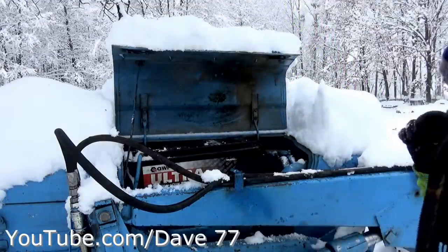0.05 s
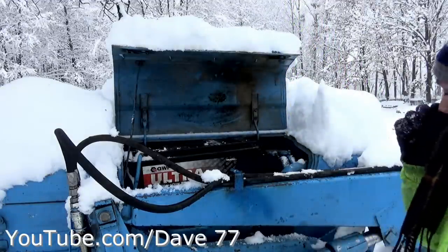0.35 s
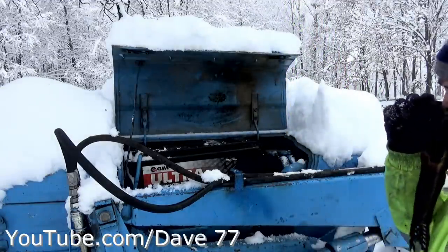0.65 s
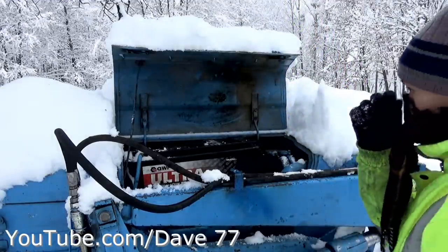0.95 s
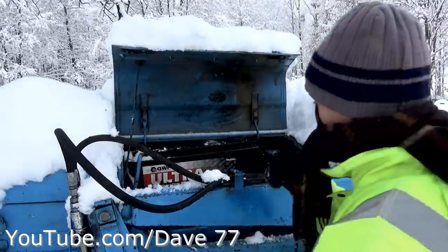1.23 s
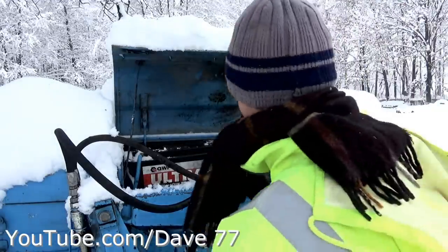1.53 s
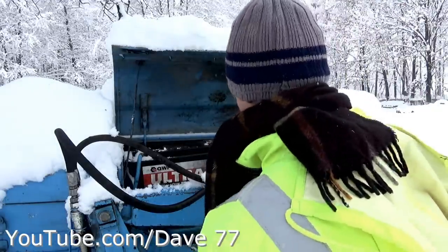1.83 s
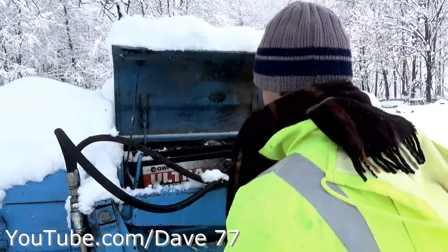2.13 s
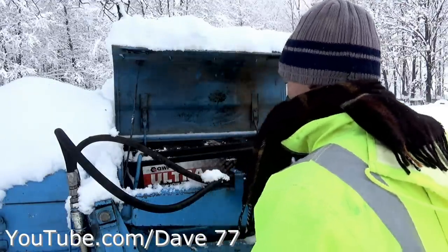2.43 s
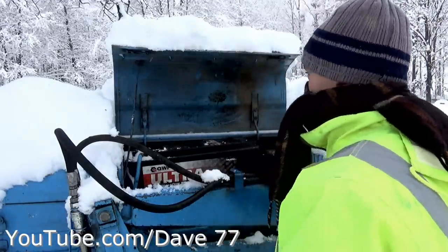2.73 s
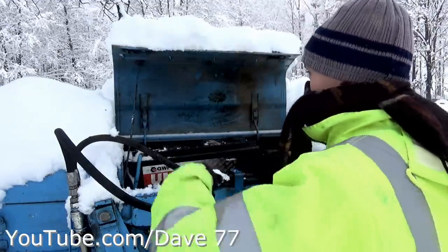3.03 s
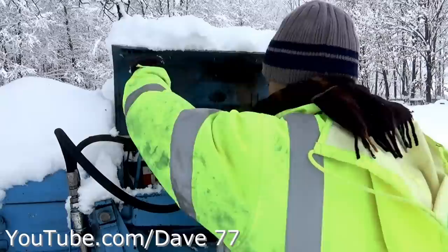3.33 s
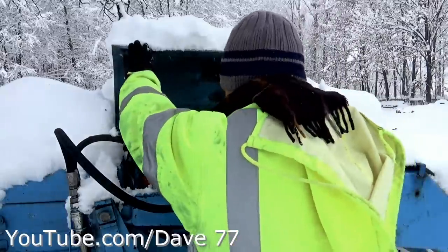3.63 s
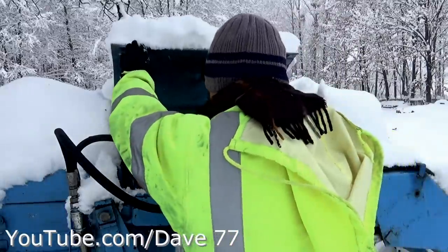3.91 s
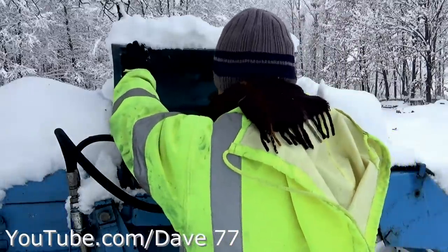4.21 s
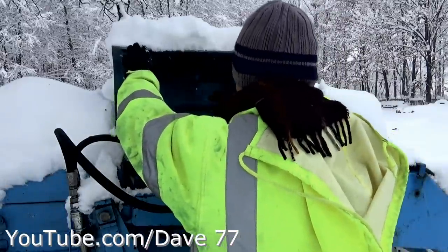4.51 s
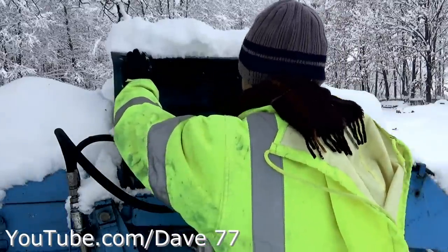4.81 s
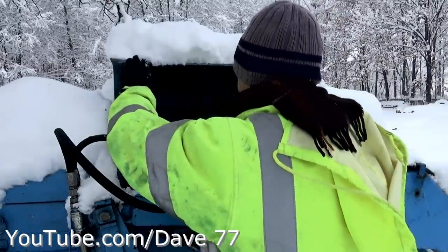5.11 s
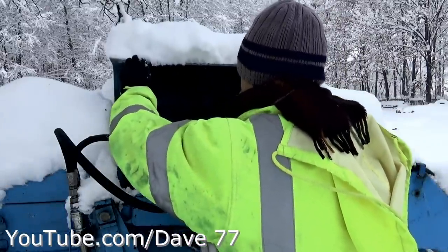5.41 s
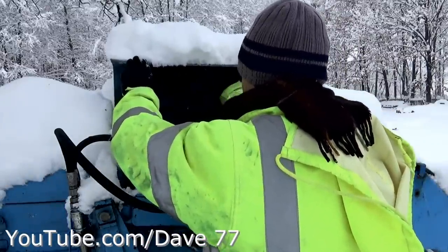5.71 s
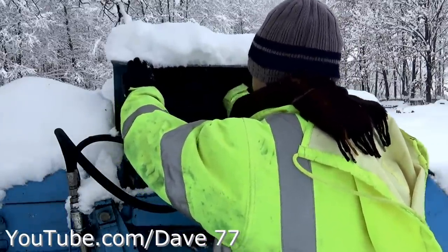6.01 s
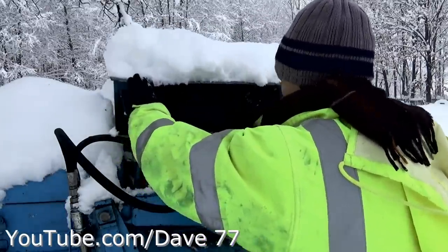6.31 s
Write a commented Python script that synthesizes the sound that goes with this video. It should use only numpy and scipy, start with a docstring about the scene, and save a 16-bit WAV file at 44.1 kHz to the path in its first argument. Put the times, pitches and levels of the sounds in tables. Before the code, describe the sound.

Someone in a stiff nylon jacket moves near the microphone, the cloth hissing, rubbing and flapping in uneven strokes. After the biggest swishes, the lid of a machine's steel box is worked loose: two quick clusters of bright clicks, hinge chatter and small knocks, with almost no echo. Faint outdoor air and a low drone lie underneath, with a slight fading squeal at the very start.

```python
"""A stiff nylon jacket swishes and flaps as its wearer, outdoors in snow, frees the lid of a machine's steel box.
Sliding cloth hisses and rustles; buckling folds snap. The lid's stay and hinges click, chatter and
knock, ringing the fittings, rim and panels briefly. Faint air and a low drone lie underneath,
with a thin squeal that fades at the start."""
import sys
import numpy as np
from scipy import signal
from scipy.fft import rfft, irfft, next_fast_len
from scipy.io import wavfile
from scipy.ndimage import map_coordinates

SR = 44100
rng = np.random.default_rng(int(sys.argv[2]) if len(sys.argv) > 2 else 0)


def pcm_store(signal):
    """Save signal as 16-bit PCM."""
    levels = np.round(np.clip(np.atleast_2d(signal), -1, 1) * 32767)
    wavfile.write(sys.argv[1], SR, levels.astype(np.int16).T)


N = 289002

# outdoor air spectrum: f/Hz, relative level/dB
AIR_SPECTRUM = [(25, -42), (70, -19), (110, 2.5), (170, -7), (240, 2), (350, -3), (600, -4.5), (1150, -3),
                (1800, -8), (2500, -10.5), (5000, -11.5), (8800, -38), (12000, -14.5), (15500, -23.5)]
# background noise bands: f/Hz, width/Hz, rms level/dB
DRONE_BANDS = [(122.5, 21, -79), (1088, 100, -74.5)]
# stereo likeness of air and cloth: f/Hz, left-right correlation/1
COHERENCE = [(120, .999), (300, 0.98), (600, 0.66), (2000, 0.65), (8000, 0.93), (13000, 1)]
# squeal and a weaker, lower tone: start f/Hz, sag/(Hz/s), level/dB, fade/(dB/s)
SQUEAL_TONES = [(1482, 130, -59, 32), (796, 430, -69.5, 3)]
# body movement in the jacket: t/s, effort/dB
BODY_EFFORT = [(0, -58), (.42, -67), (.92, -67.5), (1.12, -60), (1.45, -60.5), (1.85, -63), (1.95, -64.5),
               (2.3, -69), (2.8, -58.5), (3.24, -51), (3.5, -54.5), (4.1, -60), (4.3, -64), (4.9, -61),
               (5.1, -68.5), (5.65, -68.5), (6.22, -64.5), (6.55, -67.5)]
# sleeve strokes: peak t/s, length/s, hiss level/dB, rub level/dB
SLEEVE_STROKES = [(0.653, 0.076, -56.5, -60.5), (0.768, 0.14, -59.5, -60.5), (1.022, 0.11, -63, -63.5),
                  (1.164, 0.078, -52.5, -62), (1.304, 0.086, -52.5, -58), (1.49, 0.11, -57, -66),
                  (2.01, 0.12, -61, -83), (2.377, 0.18, -61, -80), (2.576, 0.12, -54, -72),
                  (2.64, 0.092, -46, -59), (3.22, 0.1, -49, -54.5), (4.917, 0.24, -60.5, -73),
                  (5.825, 0.17, -61, -73), (6.143, 0.19, -65, -73)]
# sliding nylon, rubbing cloth spectra: f/Hz, relative level/dB
HISS_SPECTRUM = [(300, -34), (1000, -14), (2000, -6), (3000, -5.5), (5000, -6.5), (7000, -3), (8700, 0.5),
                 (10000, -4), (12000, -13), (15500, -24.5)]
RUB_SPECTRUM = [(50, -25), (120, 3), (220, -9.5), (350, 0.5), (700, 0.5), (1300, 2.5), (2100, 0.5),
                (3000, -6), (6000, -8.5), (14000, -26)]
# big buckling folds: t/s, level/dB, f/Hz
BIG_FOLDS = [(.043, -48, 1550), (.096, -45.5, 466), (.244, -43, 417), (.252, -46.5, 565),
             (.5302, -48.5, 570), (.5337, -39, 580), (1.2002, -40.5, 355), (1.274, -42, 2300),
             (1.284, -42, 487), (1.2964, -41.5, 1880), (1.296, -35, 450), (2.06, -45, 536),
             (2.069, -47, 496), (2.613, -37, 463), (2.7059, -42, 407), (3.073, -47, 690), (3.108, -42, 580),
             (3.277, -42.5, 900), (3.869, -33.5, 438), (6.258, -53.5, 825), (6.394, -55.5, 690)]
# single steel contacts: t/s, tick level/dB, clack level/dB, panel level/dB, panel f/Hz, tick t60/s
STAY_CONTACTS = [(3.9046, -18, -29, -41, 620, 0.026), (3.92, -54, -37, -50, 700, 0.042),
                 (3.9273, -25, -27.5, -45, 704, 0.045), (3.93, -48, -32, -35.5, 730, 0.071),
                 (4.008, -30.5, -35.5, -46.5, 650, 0.05), (4.0118, -27, -29.5, -58, 600, .032),
                 (4.0165, -27.5, -26.5, -72, 520, 0.038), (4.034, -21.5, -28.5, -46, 533, 0.035),
                 (4.1809, -32.5, -35, -47.5, 277, 0.04), (4.7507, -36, -32.5, -45, 700, 0.04),
                 (5.027, -51, -69, -83, 550, 0.012), (5.1924, -50, -72, -78, 550, 0.054),
                 (5.207, -48, -63, -60, 320, 0.069), (5.215, -65, -42.5, -49, 506, 0.015),
                 (5.2775, -26.5, -36, -44, 310, 0.021), (5.29, -32, -45, -70, 700, .04),
                 (5.2938, -26.5, -30.5, -63, 700, 0.017), (5.299, -18, -29.5, -42, 720, .024),
                 (5.3011, -20.5, -31, -42, 297, .048), (6.0384, -50.5, -56.5, -56.5, 535, .025)]
# hinge chatter: t/s, gap/s, tick level/dB, clack level/dB, panel level/dB, panel f/Hz
HINGE_RUNS = [(4.114, 0.0042, -57, -57, -57.5, 850), (5.2355, .0088, -46.5, -48, -57, 480),
              (5.456, 0.0096, -52, -51.5, -56.5, 330)]
# contact position as the hands shift: t/s, left minus right/dB
CONTACT_PAN = [(3.95, 2), (5.3, 0.5)]
# modes of fittings, lid rim, snow-damped panels: f/Hz, relative level/dB, t60/s
FITTING_MODES = [(4040, -10.5, 0.057), (4596, -8.5, 0.076), (5820, -3, 0.045), (6100, -18, 0.037),
                 (6700, -21, .04), (7260, -24, .045), (8300, -0.5, 0.055), (8900, -15, .045),
                 (9100, 8, 0.039), (9700, 4, 0.025), (9690, -5, 0.022), (10400, -4, 0.07),
                 (11100, -9, 0.064)]
RIM_MODES = [(1104, -6.5, 0.028), (1258, 3.5, 0.046), (1617, -5.5, 0.059), (1980, -3, 0.031),
             (2234, -4.5, 0.043), (2650, -5, 0.039), (3110, -5, 0.032), (3324, -6, 0.045)]
PANEL_MODES = [(270, -10.5, 0.14), (304.5, 0.5, 0.093), (357.6, -9.5, 0.23), (446, -9.5, 0.16),
               (573, -6, 0.13), (717, -2, 0.11), (872, -3, 0.073)]
# dense-mode spectra of the same parts: f/Hz, relative level/dB
TICK_SPECTRUM = [(1500, -22.5), (4000, -8), (6000, 3), (7500, -0.5), (8800, 8), (10500, 2), (12500, -8),
                 (16000, -41)]
CLACK_SPECTRUM = [(400, -29), (850, -8), (1100, 1.5), (1290, -3), (1450, 2.5), (1620, -3.5), (1820, -5.5),
                  (2200, 1.5), (2700, -2.5), (4000, -5), (7000, -23)]
KNOCK_SPECTRUM = [(30, -42), (130, -17), (290, 5), (420, -20), (560, 7), (850, 1), (1200, -9), (2500, -49)]
# decay of reflections: f/Hz, t60/s
REVERB_T60 = [(200, 0.61), (1500, 0.85), (5000, 0.55), (12000, 0.11)]


def amp(db):
    """Level to gain."""
    return 10 ** (np.asarray(db) / 20)


def unit(x):
    """Scale to rms 1."""
    return x / np.sqrt(np.mean(x ** 2) + 1e-20)


def along(points, hz):
    """Interpolate (f/Hz, value) rows on a log axis."""
    points_hz, values = np.transpose(points)
    return np.interp(np.log(hz + 1), np.log(points_hz + 1), values)


def wobble(rate_hz):
    """Smooth random curve with knots at rate_hz."""
    knots = rng.standard_normal(int(N * rate_hz / SR) + 4)
    return map_coordinates(knots, [np.arange(N) * rate_hz / SR])


def hump(at_s, length_s):
    """Gaussian swell, height 1."""
    return np.exp(-2 * ((np.arange(N) / SR - at_s) / length_s) ** 2)


def filtered(x, response):
    """Apply the gain response(hz)."""
    n = x.shape[-1]
    n_fft = next_fast_len(n + 4096)
    return irfft(rfft(x, n_fft) * response(np.fft.rfftfreq(n_fft, 1 / SR)), n_fft)[..., :n]


def coloured(x, spectrum):
    """Shape by a spectrum; rms 1."""
    return unit(filtered(x, lambda hz: amp(along(spectrum, hz))))


def spread(pair, spectrum):
    """Two independent noises to coloured, near-mono stereo; rms 1."""
    def response(hz):
        angle = np.arccos(np.clip(along(COHERENCE, hz), -1, 1)) / 2
        return amp(along(spectrum, hz)) * [np.cos(angle), np.sin(angle)]
    mid, side = filtered(pair, response)
    return unit(np.array([mid + side, mid - side]))


def panned(x, left_db):
    """Set left over right by left_db."""
    return x * amp([[left_db / 2], [-left_db / 2]])


def add(track, at_s, sound):
    """Mix in place."""
    start = round(at_s * SR)
    part = track[..., start:start + sound.shape[-1]]
    part += sound[..., :part.shape[-1]]


def background():
    """Quiet outdoor air, a low drone and a narrow band of far hiss."""
    air = amp(-64.5) * spread(rng.standard_normal((2, N)), AIR_SPECTRUM)
    for centre_hz, width_hz, db in DRONE_BANDS:
        band = filtered(rng.standard_normal(N), lambda hz: 1 / (1 + (2 * (hz - centre_hz) / width_hz) ** 2))
        air += amp(db) * unit(band)
    return air


def squeal(start_hz, sag_hz_per_s, db, fade_db_per_s, hold_s=0.43, release_s=0.08):
    """An unsteady tone sinks, fades, swells once and stops."""
    t = np.arange(N) / SR
    hz = start_hz - sag_hz_per_s * t + 9 * wobble(88.6)
    phase = 2 * np.pi * np.cumsum(hz) / SR
    surge_db = 7 * hump(at_s=0.213, length_s=0.047)
    level_db = db - fade_db_per_s * t + surge_db + 2.1 * wobble(53.4)
    release = np.clip(1 - (t - hold_s) / release_s, 0, 1)
    return release * amp(level_db) * np.sqrt(2) * np.sin(phase)


def body_effort_db():
    """How hard the body moves, per sample."""
    return np.interp(np.arange(N) / SR, *np.transpose(BODY_EFFORT))


def weave(snaps_per_s, snap_gain):
    """Threads catch: sparse tiny snaps over smooth noise, as mid and side."""
    snaps = (rng.random(N) < snaps_per_s / SR) * rng.standard_normal(N)
    mid, side = rng.standard_normal((2, N))
    return np.array([mid + snap_gain * unit(snaps), side])


def jacket():
    """Nylon slides, sleeve and scarf rub; both follow effort and swell with each sleeve stroke."""
    effort_db = body_effort_db()
    full_db = effort_db.max()
    sliding = amp(full_db + 5 + 1.227 * (effort_db - full_db))
    rubbing = amp(full_db + 1.5 + 1.266 * (effort_db - full_db))
    for at_s, length_s, hiss_db, rub_db in SLEEVE_STROKES:
        speed = hump(at_s, length_s)
        sliding = np.hypot(sliding, amp(hiss_db) * speed)
        rubbing = np.hypot(rubbing, amp(rub_db) * speed)
    sliding *= amp(0.88 * wobble(35))
    hiss = sliding * spread(weave(snaps_per_s=1500, snap_gain=0.65), HISS_SPECTRUM)
    rubbing *= amp(1.3 * wobble(60))
    rustle = rubbing * spread(weave(snaps_per_s=400, snap_gain=0.58), RUB_SPECTRUM)
    return panned(hiss + rustle, left_db=-0.7)


def small_folds(candidates=200, peak_per_s=30, centre_hz=760, scatter_oct=0.37, scatter_db=1.5):
    """Random folds, denser and louder with effort. Rows: t/s, level/dB, f/Hz."""
    effort_db = body_effort_db()
    onsets = rng.integers(N, size=candidates)
    chance = rng.random(candidates)
    size, pitch = rng.standard_normal((2, candidates))
    level_db = effort_db[onsets] + 2 + scatter_db * size
    hz = centre_hz * 2 ** (scatter_oct * pitch)
    folds_per_s = peak_per_s * amp(effort_db[onsets] - effort_db.max())
    buckles = chance < folds_per_s * N / SR / candidates
    return np.transpose([onsets / SR, level_db, hz])[buckles]


def flaps():
    """A fold buckles with a pressure pulse; nearby steel and body reflect a short flutter."""
    out = np.zeros(N)
    t = np.arange(SR // 16) / SR
    head = SR // 200
    for at_s, db, hz in [*BIG_FOLDS, *small_folds()]:
        cycles = hz * t
        airflow = (1 - np.cos(2 * np.pi * cycles ** 0.76)) * np.exp(-cycles / 0.75)
        pressure = unit(np.gradient(airflow)[:head])
        spectrum = [(0.29 * hz, -32), (0.404 * hz, 1), (0.89 * hz, 0),
                    (1.6 * hz, -6), (4.6 * hz, -19), (13 * hz, -40)]
        flutter_envelope = 0.82 * amp(-60 * cycles / 26) * (1 - np.exp(-t / 0.001))
        flap = flutter_envelope * coloured(rng.standard_normal(len(t)), spectrum)
        add(flap, 0, pressure)
        cloth_lowpass = signal.butter(2, min(3.8 * hz, 0.4 * SR), fs=SR, output="sos")
        flap = signal.sosfilt(cloth_lowpass, flap)
        add(out, at_s, amp(db) * flap / np.sqrt(np.mean(flap[:head] ** 2)))
    return out


def struck_steel(modes, spectrum, t60_s, rise_s, ring_db, crack, width, head_s, focus_hz=None):
    """One blow: a burst of dense modes plus a few ringing ones; rms 1 over the first head_s."""
    t = np.arange(SR // 6) / SR
    hz, db, mode_t60_s = np.transpose(modes)[:, :, None]
    if focus_hz:  # strike position favours nearby modes, -8 dB/octave
        away_db = lambda f: -8 * np.abs(np.log2(f / focus_hz))
        db = db + away_db(hz)
        spectrum = [(f, level_db + away_db(f)) for f, level_db in spectrum]
    db = db + rng.normal(0, 2.7, hz.shape)
    hz = hz * rng.normal(1, 0.00087, hz.shape)
    phase = rng.uniform(0, 2 * np.pi, hz.shape)
    ring = np.sum(amp(db - 60 * t / mode_t60_s) * np.sin(2 * np.pi * hz * t + phase), axis=0)
    decay = amp(-60 * t / t60_s) + crack * amp(-60 * t / 0.0086)  # direct crack dies first
    mid, side = coloured(rng.standard_normal((2, len(t))), spectrum) * decay
    mid += amp(ring_db) * ring
    blow = np.array([mid + width * side, mid - width * side]) * (1 - np.exp(-t / rise_s))
    return blow / np.sqrt(np.mean(blow[:, :int(head_s * SR)] ** 2))


def contact(at_s, tick_db, clack_db, panel_db, panel_hz, t60_s):
    """Fittings tick, the rim clacks, the panels knock with a slower rise; at_s sets the pan."""
    tick = struck_steel(FITTING_MODES, TICK_SPECTRUM, t60_s, rise_s=0.00039,
                        ring_db=-12, crack=0.93, width=0.14, head_s=0.0029)
    clack = struck_steel(RIM_MODES, CLACK_SPECTRUM, 1.4 * t60_s, rise_s=0.00019,
                         ring_db=-1.5, crack=0.65, width=0.18, head_s=0.006)
    knock = struck_steel(PANEL_MODES, KNOCK_SPECTRUM, 2.15 * t60_s, rise_s=0.0022,
                         ring_db=2, crack=0, width=0.066, head_s=0.011, focus_hz=panel_hz)
    left_db = np.interp(at_s, *np.transpose(CONTACT_PAN))
    return panned(amp(tick_db) * tick + amp(clack_db) * clack + amp(panel_db) * knock, left_db)


def lid(rebound_s=0.06, rebound_db=(-34.5, -32.5, -21.5)):
    """The stay strikes and falls back once, softly; loose hinges chatter in runs of four."""
    out = np.zeros((2, N))
    for at_s, *levels_db, panel_hz, t60_s in STAY_CONTACTS:
        add(out, at_s, contact(at_s, *levels_db, panel_hz, t60_s))
        add(out, at_s + rebound_s, contact(at_s, *np.add(levels_db, rebound_db), panel_hz, t60_s))
    for at_s, gap_s, *levels_db, panel_hz in HINGE_RUNS:
        for k, scatter_db in enumerate(rng.normal(0, 2, 4)):
            hit = contact(at_s, *levels_db, panel_hz, t60_s=0.044)
            add(out, at_s + k * gap_s, amp(scatter_db) * hit)
    return out


def reflections(x):
    """Reverb off the machine and snowy trees; treble dies first."""
    hz, t, bins = signal.stft(rng.standard_normal((2, SR // 2)), SR, nperseg=256)
    decay = amp(-60 * t / along(REVERB_T60, hz)[:, None])
    _, tail = signal.istft(bins * decay, SR, nperseg=256)
    return signal.fftconvolve(x, tail / np.linalg.norm(tail[0]), axes=1)[:, :N]


def scene():
    """Stereo mix; reverb on the steel only."""
    steel = lid()
    mix = steel + amp(-31.5) * reflections(steel) + jacket() + background()
    return mix + sum(squeal(*tone) for tone in SQUEAL_TONES) + flaps()


def record(dry, low_cut_hz=100, top_hz=16000):
    """Thin the deep bass, cut everything above top_hz."""
    low_cut = signal.butter(3, low_cut_hz, "highpass", fs=SR, output="sos")
    return filtered(signal.sosfilt(low_cut, dry), lambda hz: hz < top_hz)


dry = scene()
out = record(dry)
pcm_store(out)
```